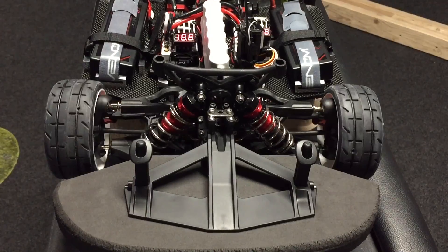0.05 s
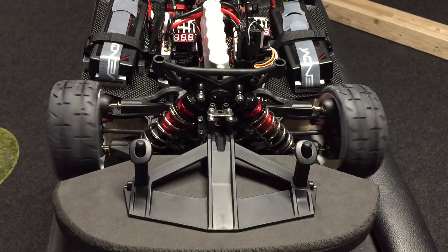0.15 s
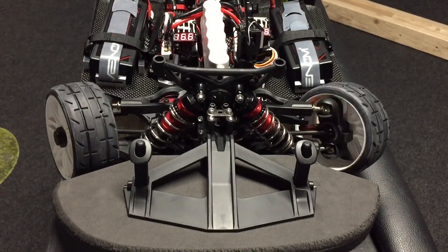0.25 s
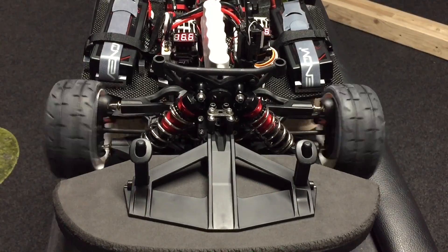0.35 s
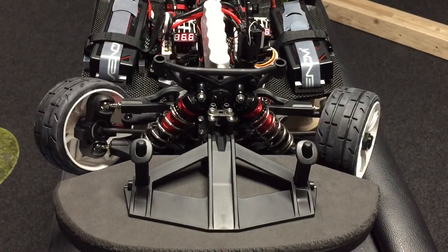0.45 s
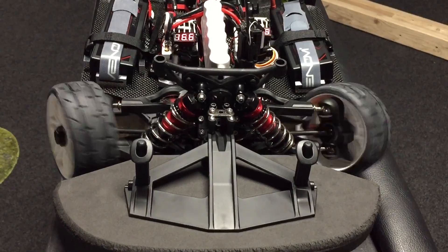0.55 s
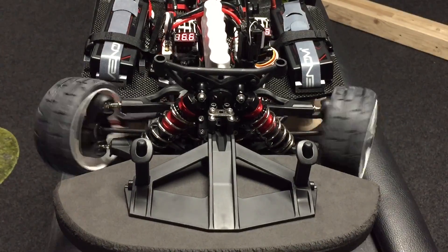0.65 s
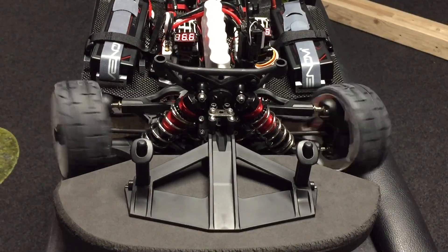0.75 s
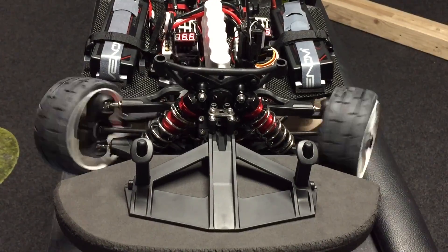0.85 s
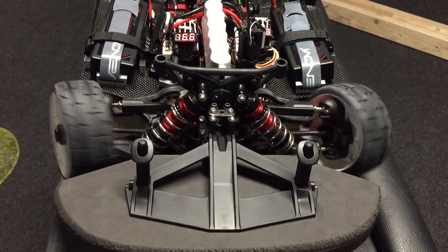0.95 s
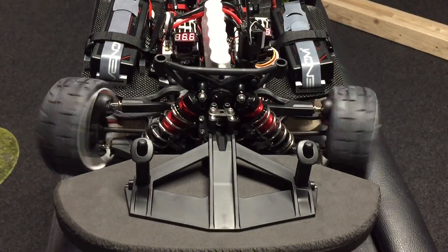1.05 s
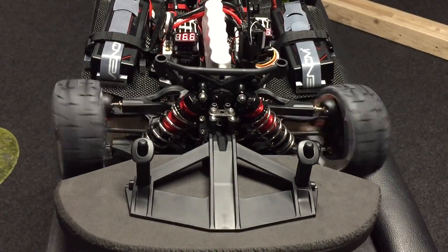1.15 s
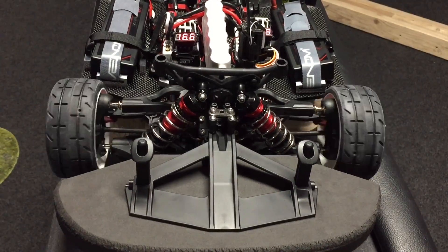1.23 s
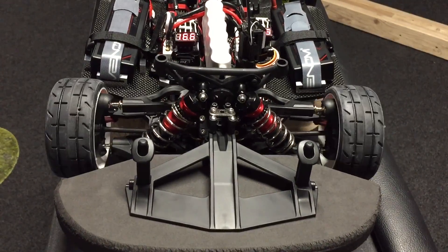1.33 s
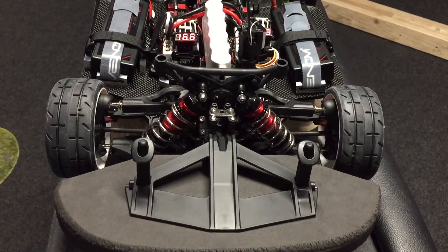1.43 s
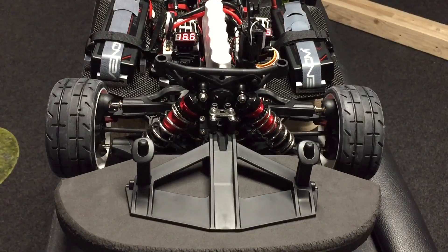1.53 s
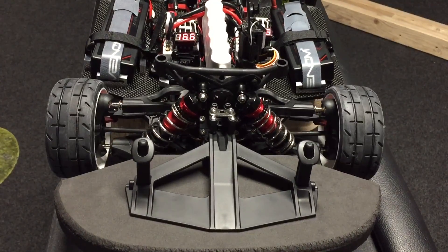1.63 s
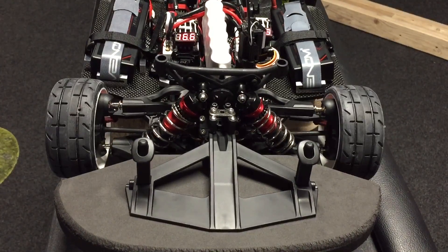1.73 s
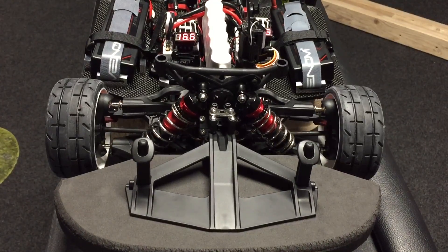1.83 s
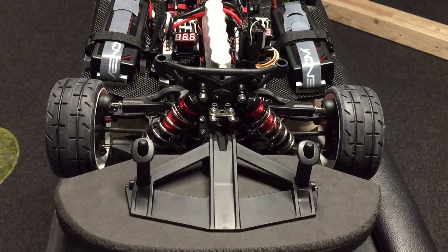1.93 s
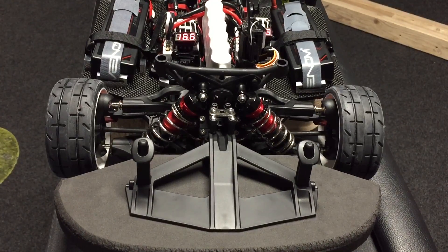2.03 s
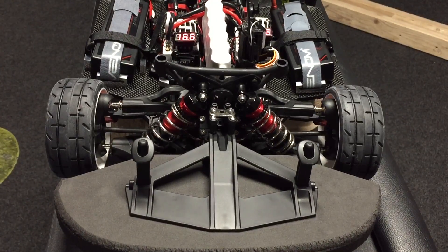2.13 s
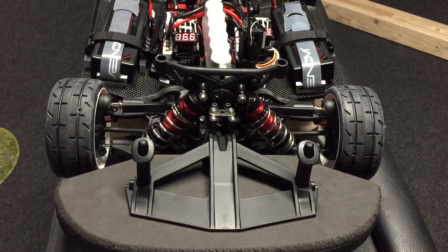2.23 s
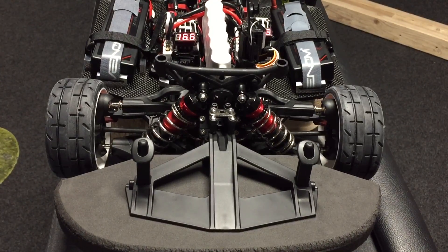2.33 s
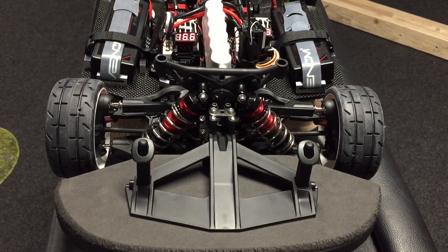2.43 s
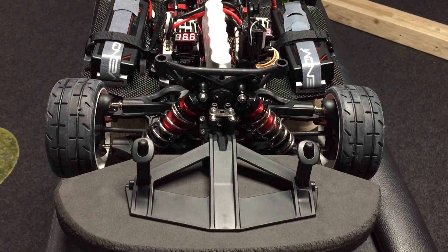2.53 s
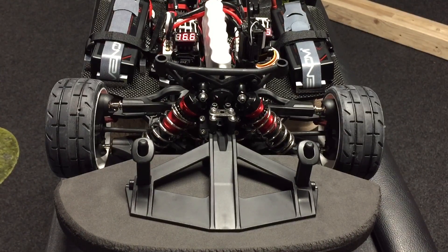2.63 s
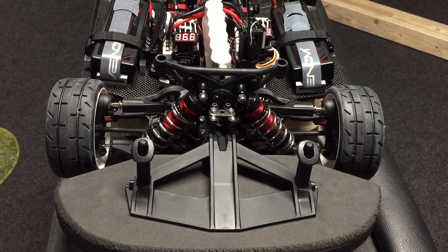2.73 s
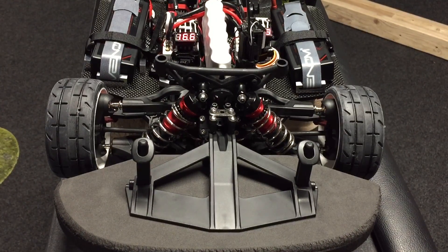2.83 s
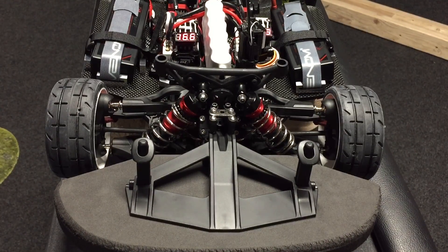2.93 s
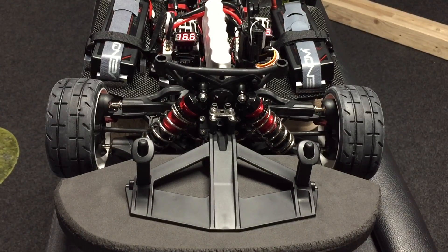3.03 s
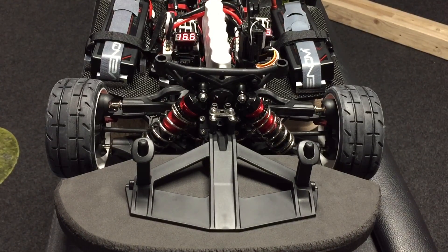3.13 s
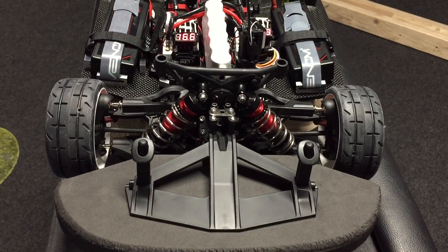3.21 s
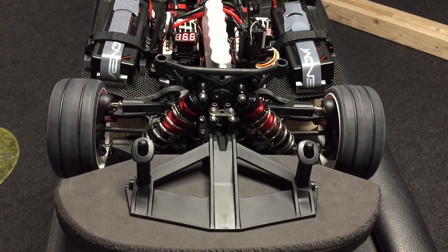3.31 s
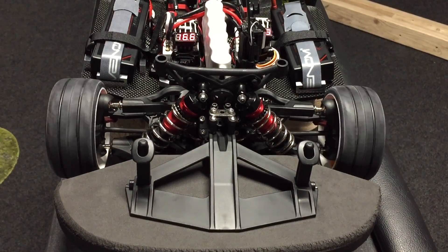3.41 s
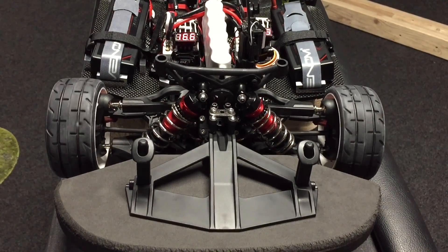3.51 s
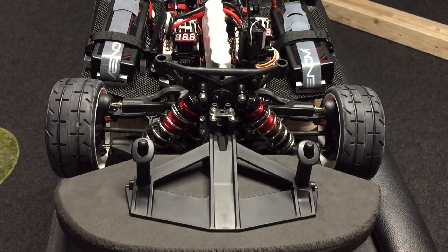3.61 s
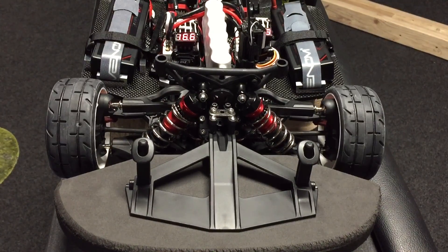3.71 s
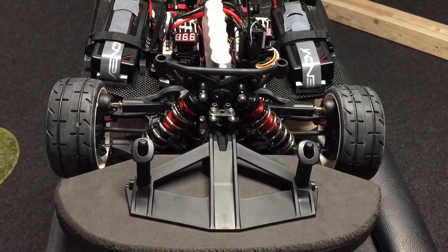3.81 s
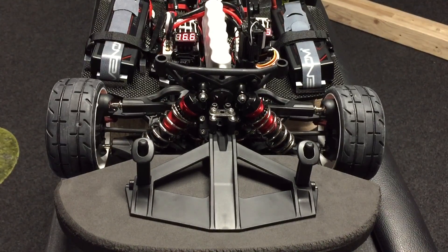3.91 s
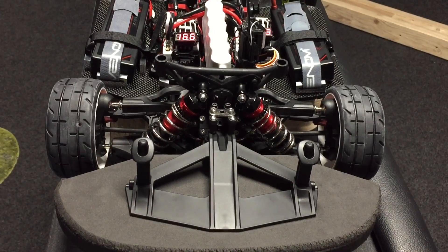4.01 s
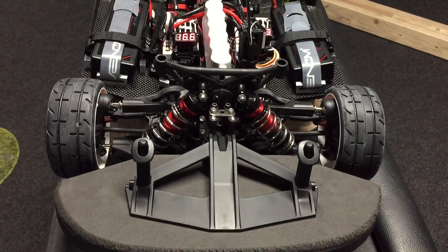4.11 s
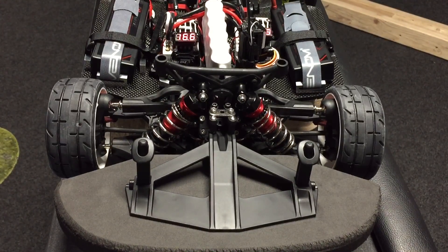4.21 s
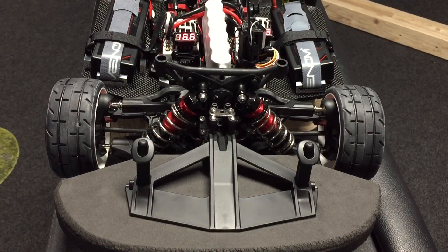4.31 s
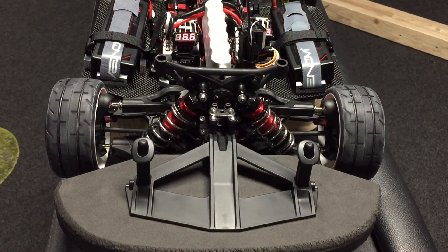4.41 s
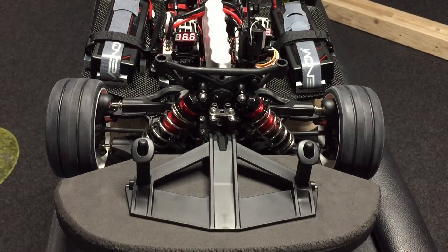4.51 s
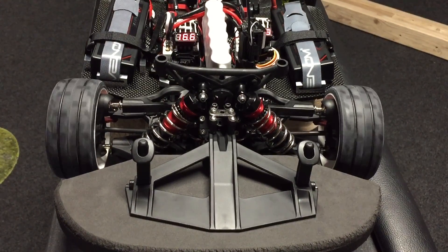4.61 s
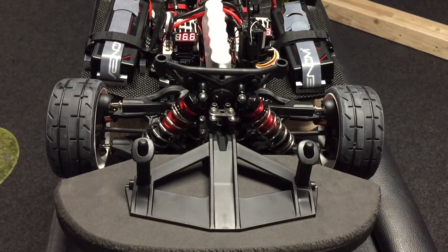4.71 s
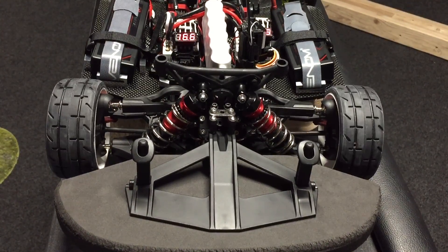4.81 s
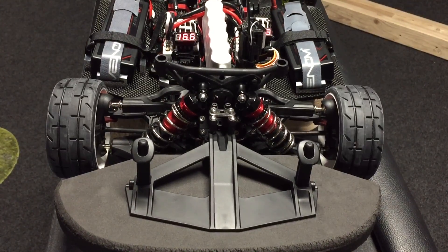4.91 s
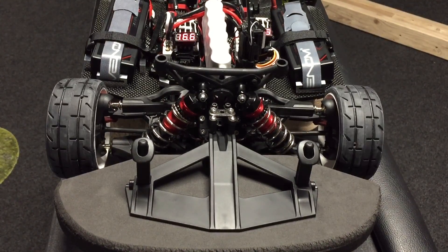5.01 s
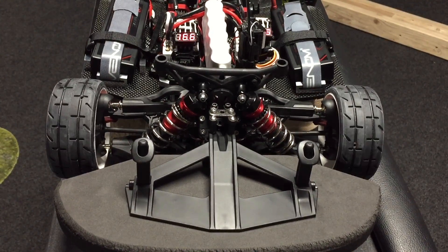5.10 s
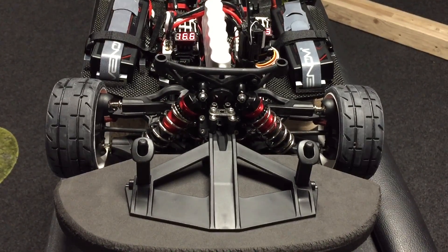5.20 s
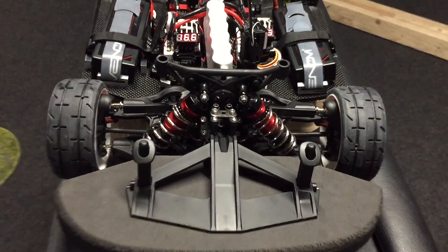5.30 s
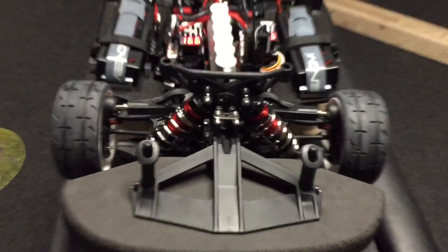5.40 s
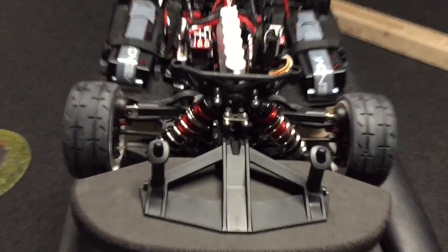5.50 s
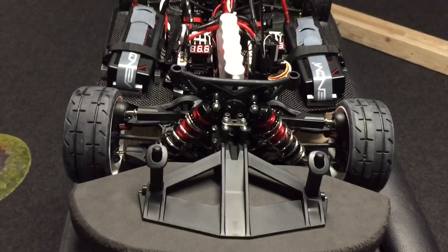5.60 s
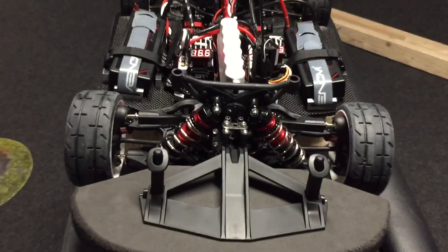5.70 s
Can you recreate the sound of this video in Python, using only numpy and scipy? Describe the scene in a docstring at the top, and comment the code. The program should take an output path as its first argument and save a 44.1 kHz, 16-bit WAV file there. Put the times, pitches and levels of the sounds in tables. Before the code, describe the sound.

A model car's steering servo zips and clacks rapidly side to side, then its drivetrain clatters in two short bursts over a tiny fan whine.

```python
"""Small room, a model car on a stand, the microphone in a camera close by; two tiny cooling fans run throughout.
First the steering servo throws the wheels side to side: swept gear whine, grainy rattle and tyre scrub,
with struck modes for the clacks of linkage slack. Holding its place, the servo then ticks faintly.
The drive motor blips twice and the drivetrain clatters out as noise grains, surges and a steel ring.
At the end the camera is moved: rumble, creak and two taps through its body."""
import sys
import numpy as np
from scipy import signal
from scipy.fft import rfft, irfft
from scipy.io import wavfile
from scipy.ndimage import uniform_filter1d

SR = 44100
rng = np.random.default_rng(int(sys.argv[2]) if len(sys.argv) > 2 else 0)


def file_out(sig):
    """Save sig as 16-bit WAV at sys.argv[1]."""
    # one column per channel
    cols = np.atleast_2d(sig).T
    # limit, then scale
    lim = np.clip(cols, -1, 1)
    pcm = np.round(lim * 32767).astype(np.int16)
    wavfile.write(sys.argv[1], SR, pcm)


N = 253575
T = np.arange(N) / SR

# Shaft speed of each fan. Each row: time in seconds, shaft turns a second.
FAN_A_SPEED = [(0, 239.6), (1.3, 239.9), (2.3, 241.1), (3.5, 241.3), (4, 242), (5.75, 242.3)]
FAN_B_SPEED = [(0, 204.7), (1.5, 204.8), (3, 205.1), (4.3, 205.5), (5.75, 205.6)]
# Tones of each seven-bladed fan. Each row: multiple of the shaft speed, mean level in dB rms.
FAN_A_ORDERS = [(1, -80), (2, -75), (7, -52), (8, -78), (14, -75), (21, -63), (25, -79), (28, -75)]
FAN_B_ORDERS = [(1, -77), (5, -72), (7, -54), (14, -79), (20, -79)]
# Colour of fan air and room tone. Each row: frequency in Hz, relative density in dB per Hz.
AIR_SPECTRUM = [(18, -74), (30, -52), (52, -18), (196, -24.5), (443, -44), (480, -36), (676, -39),
                (1000, -6.5), (1660, -6), (2100, -18.5), (4530, -17.5), (5160, -25), (8310, -20.5),
                (15200, -56.5), (16500, -56)]
AIR_DB = -54.5  # mean level, rms
# Resonances of the fan shrouds. Each row: frequency in Hz, width in Hz, level in dB rms.
SHROUD_PEAKS = [(1013, 17, -63.5), (1162, 87, -56.5), (4010, 70, -72), (5500, 630, -57.5), (8350, 430, -69),
                (9900, 430, -104)]
# Decay of the room. Each row: frequency in Hz, time to fall 60 dB in seconds.
ROOM_DECAY = [(250, 0.23), (660, 0.56), (1740, 0.46), (4590, 0.35), (12000, 0.062)]

# Hands shifting on the camera. Each row: time in seconds, rumble level in dB, creak level in dB.
HANDLING_LEVELS = [(5.22, -89, -76), (5.258, -57.5, -79), (5.346, -70, -79), (5.382, -55.5, -78),
                   (5.478, -52, -70), (5.492, -48, -43), (5.51, -52, -64), (5.575, -50.5, -66),
                   (5.585, -45, -51), (5.605, -53, -61), (5.708, -55, -52), (5.75, -64, -83)]
# A finger meets the camera body. Each row: start in seconds, peak of the body's ring in dB.
FINGER_TAPS = [(5.477, -32), (5.485, -29)]
# Colours of the handling. Each row: frequency in Hz, relative density in dB per Hz.
RUMBLE_SPECTRUM = [(15, -30), (35, -5), (70, 2.5), (130, -11.0), (250, -31), (1000, -70)]
CREAK_SPECTRUM = [(150, -32), (300, -14), (420, -3), (600, -18), (1200, -40), (5000, -71)]
# Modes of the camera body. Each row: frequency in Hz, relative level in dB, time to fall 60 dB in seconds.
BODY_MODES = [(97, -5, 0.06), (230, -4, 0.023), (380, -7, 0.02), (540, -7, 0.021), (850, -5.0, 0.023),
              (1300, -3, .015), (1950, -6, 0.013), (2540, -2.5, 0.015), (3030, -6, 0.015)]

# Spells of faint ticks from the holding servo. Each row: start in seconds, length in seconds, first level in dB.
HOLD_SPELLS = [(.07, 0.13, -62), (.32, .065, -59), (1.436, 0.18, -62.5), (1.745, .06, -74),
               (2.12, .12, -68), (2.26, .25, -73), (2.58, .03, -69), (2.66, .03, -67), (2.69, .5, -74)]
HOLD_FADE_DB = -9  # change over each spell
# Colour of the ticks. Each row: frequency in Hz, relative density in dB per Hz.
TICK_SPECTRUM = [(6000, -40), (9000, -23), (10300, -13), (11000, -2), (11800, -1), (13000, -11), (16000, -26)]

# The drivetrain's two runs, a list for each. Each row: time in seconds, clatter level in dB, upper part in dB.
DRIVE_RUNS = [
    [(3.303, -36, -25.5), (3.325, -34, -52), (3.369, -32, -22.5), (3.409, -37, -37), (3.45, -35.5, -30),
     (3.51, -38, -45), (3.604, -45.5, -58), (3.73, -75, -87)],
    [(4.477, -51, -36), (4.543, -39, -41), (4.65, -41.5, -41), (4.708, -44.5, -45), (4.734, -41, -39),
     (4.778, -42, -62), (4.802, -53, -47), (4.83, -66, -76), (4.9, -70, -70)],
]
# Colours of the clatter and its upper part. Each row: frequency in Hz, relative density in dB per Hz.
CLATTER_SPECTRUM = [(59, -60), (100, -28), (317, -19), (376, 3), (480, -7), (600, -3), (882, -1.5),
                    (1190, -10), (1310, -2.5), (2070, -14.5), (2680, -14.5), (3000, -12.5), (3900, -16),
                    (6600, -120)]
CLATTER_UPPER_SPECTRUM = [(1060, -3.5), (1800, 3), (1960, -2.5), (5730, -11), (10500, -30), (13000, -25),
                          (14200, -38), (15800, -36), (16500, -50)]
# Resonances of the chassis tub. Each row: frequency in Hz, width in Hz, relative level in dB.
TUB_PEAKS = [(395, 9.8, -6), (954, 34, -27), (1300, 880, 6), (2280, 100, 1), (2685, 93, 8.5),
             (3740, 150, 0)]
# Gear and drive-shaft slack knocking. Each row: start in seconds, reference level in dB,
# upper part in dB against it, peak of the steel part's ring in dB against it.
KNOCKS = [(3.303, -17, -15, -15.5), (3.315, -19, -17, -27), (3.338, -14, -7, -34), (3.351, -18, -5, -36),
          (3.364, -13.5, -18, -33), (3.375, -8, -15, -33), (3.386, -20.5, -3, -24), (3.399, -29, -13, -13),
          (3.428, -14.5, -7, -20), (3.457, -26, -13, -8), (3.496, -27, -17, -21), (3.533, -21.5, -6, -22),
          (3.586, -25, -13, -37), (3.623, -25.5, -14, -35), (4.479, -15.5, -11, -40),
          (4.517, -18, -11, -29), (4.535, -28, -11, -34), (4.543, -23, -6, -39), (4.557, -20, -14, -43),
          (4.577, -16.5, -6, -39), (4.601, -30, -10, -26), (4.614, -27, -8, -20), (4.629, -25, -8, -22),
          (4.64, -27.5, 3, -10.5), (4.667, -29, 1, -26), (4.686, -31, -6, -30), (4.729, -22, -18, -15),
          (4.79, -19.5, -11.5, -38), (4.802, -24.5, -15, -34)]
TICK_DB = -25  # sharp tick against a knock's upper part
# Modes of a steel part. Each row: frequency in Hz, relative level in dB, time to fall 60 dB in seconds.
STEEL_MODES = [(12600, 0, .2), (8975, -6, .05), (7560, -8, .04)]
# Switching tone of the drive motor. Each row: start in seconds, end in seconds, level in dB rms, its octave in dB rms.
THROTTLE_TONES = [(3.287, 3.392, -48.5, -55), (4.476, 4.583, -51.5, -55.5)]
SWITCH_HZ = 5568
# Colour of the shaking stand. Each row: frequency in Hz, relative density in dB per Hz.
STAND_SPECTRUM = [(20, -28), (60, -12), (150, -13), (300, -9), (900, -60)]

# Slack taken up in the linkage. Each row: start in seconds, main ring's peak in dB, dull part in dB against it.
CLACKS = [(0.0259, -13, -31), (0.295, -25.5, 8.5), (0.3952, -17, -14), (0.4467, -15.5, -21),
          (0.494, -5, -8), (0.5899, -13.5, -25), (0.63, -20.5, -16), (0.6574, -28, 2), (0.6644, -29, -14),
          (0.7189, -20, -7), (0.7658, -6, -6), (0.8, -20, -26), (0.844, -31, -16), (0.9127, -20.5, -6),
          (0.959, -7.5, -6.5), (0.9956, -17.5, -14), (1.067, -22.5, 0), (1.076, -29, 8.5),
          (1.1304, -23, -14), (1.1774, -6.5, -6.5), (1.21, -16, -18), (1.2517, -22, -22), (1.3312, -19, -2)]
# Dull, main and bright modes of the linkage. Each row: frequency in Hz, relative level in dB,
# time to fall 60 dB in seconds.
LINK_DULL_MODES = [(1100, -2, 0.02), (1514, 6, 0.013), (1866, 14.5, 0.0096), (2220, -22, 0.015)]
LINK_MODES = [(2700, -8, .012), (3200, -9, .008), (3720, -1.5, .012), (4500, -10, .007), (5290, -8, .008),
              (6350, -4, .009), (7340, -8, .009)]
LINK_BRIGHT_MODES = [(8660, 3, 0.023), (9950, 6, 0.011), (11000, -3, 0.02), (12600, 1, .006),
                     (14000, -1, .004)]
BRIGHT_DB, BRIGHT_SHARE = -34, .35  # the bright ring grows only a little with the blow
# The chassis rocks on its stand. Each row: start in seconds, level in dB at the blow, frequency in Hz.
ROCKS = [(0.036, -41.5, 130), (0.297, -31.5, 141), (0.427, -39, 148), (0.502, -43, 139), (0.597, -48, 151),
         (0.663, -33, 149), (0.814, -47, 140), (0.881, -55, 146), (0.958, -47, 156), (1.071, -33.5, 154.5),
         (1.189, -43, 153), (1.263, -50, 115), (4.52, -47, 127)]

# The steering at work, a list for each spell. Each row: time in seconds, rattle level in dB, tyre scrub level in dB.
STEER_SPELLS = [
    [(0.0, -35, -50), (0.034, -34, -38), (0.088, -55, -57), (0.11, -49, -62)],
    [(0.2, -55, -75), (0.222, -45.5, -76), (0.3, -33.5, -29.5), (0.32, -46.5, -31), (0.34, -50, -40),
     (0.38, -50, -52), (0.392, -36, -37.5), (0.494, -34.5, -36), (0.548, -39, -44), (0.59, -33.5, -35.5),
     (0.648, -40, -44), (0.66, -37, -26.5), (0.758, -36.5, -50), (0.77, -38, -31), (0.79, -38, -39),
     (0.954, -37.5, -41.5), (0.964, -39, -27), (0.98, -40, -39), (1.136, -37.5, -39), (1.165, -35, -36.5),
     (1.184, -40, -31), (1.2, -37, -38), (1.316, -40, -40), (1.43, -58, -64.5)],
]
# Colours of gear rattle and tyre scrub. Each row: frequency in Hz, relative density in dB per Hz.
RATTLE_SPECTRUM = [(590, -15.5), (1000, 1.5), (1880, -2.5), (2270, 1), (3310, -0.5), (4650, -12),
                   (5110, -6.5), (6160, -3), (8860, -7.5), (10100, -11.5), (15000, -8.5), (15900, -12),
                   (16500, -60)]
SCRUB_SPECTRUM = [(35, -63), (60, -21), (145, -9.5), (215, -20.5), (398, -9.5), (461, -10.5), (618, -6),
                  (1330, -8.5), (2000, -3), (2600, -43), (4400, -120)]
# Resonances of the servo case. Each row: frequency in Hz, width in Hz, relative level in dB.
CASE_PEAKS = [(1880, 100, 2), (3840, 63, -31), (4530, 210, 3), (5720, 450, -10.5), (8830, 220, -0.5),
              (11160, 490, -6)]
# Servo strokes: the tooth rate climbs to a knee, then sags or creeps on; a braking stroke has its knee at once.
# Each row: start in seconds, knee in seconds after it, length in seconds, tooth rate in Hz at start, knee and end,
# whine level in dB and its octave in dB, both before the colour of the case.
STROKES = [(0, .001, .022, 4510, 4500, 3550, -38, -46), (.243, .03, .05, 2480, 4500, 4500, -39, -41),
           (.4, .001, .024, 4000, 3990, 2850, -55, -41), (.424, .022, .047, 3800, 4950, 4250, -33, -43),
           (.498, .001, .018, 4900, 4890, 3060, -42, -41), (.54, .021, .045, 3240, 4700, 3530, -37, -46),
           (.612, .001, .019, 4800, 4790, 4450, -33, -54), (.672, .008, .027, 3000, 3450, 3560, -44, -36),
           (.701, .016, .048, 4200, 4950, 4660, -35, -50), (.78, .026, .066, 2580, 4520, 4800, -35, -34),
           (.878, .034, .058, 2130, 4950, 4400, -33, -42), (.975, .026, .07, 2580, 4520, 4800, -38, -34),
           (1.087, .001, .022, 3560, 3550, 3400, -44, -39), (1.111, .017, .045, 4100, 5000, 4600, -32, -48),
           (1.193, .022, .058, 2580, 4480, 4800, -35, -35), (1.28, .03, .032, 2390, 4820, 4800, -39, -39)]
# How the case passes tooth tones. Each row: frequency in Hz, gain in dB.
WHINE_GAIN = [(2200, -10), (3100, 1), (3700, -3), (4250, 3), (4520, -3), (4750, 5), (5200, 0), (6300, 4),
              (7000, 4), (8000, 2), (8900, 3), (9500, -8), (15000, -12)]
# The servo strains against its end stop: start in seconds, end in seconds, buzz level in dB rms.
STALL = (.34, .39, -47)
UPDATE_HZ = 368.7  # the servo's drive pulses a second
# An off-centre gear loads the teeth once a turn: period and first full load in seconds, depth from 0 to 1.
THROB_S, THROB_FIRST_S, THROB_DEPTH = .0255, .008, .8
# Gears rattle harder under load and when jolted; a jolt dies by 20 dB in CLACK_RATTLE_S seconds.
STROKE_RATTLE_DB, CLACK_RATTLE_DB, CLACK_RATTLE_SHARE, CLACK_RATTLE_S = -36, -26, 0.39, 0.016
# Drive buzz against the rattle: strong while the motor strains, weak while it runs.
BUZZ_IDLE_DB, BUZZ_MOVING_DB = -3, -22
SLOWING_OCTAVE_DB = 8  # the octave is stronger while the gears slow down
EDGE_HZ = 15800  # upper band limit


def gain_of(db):
    """Amplitude factor of a level in dB."""
    return 10 ** (np.asarray(db) / 20)


def evened(x):
    """Scales a sound to rms 1."""
    return x / np.sqrt(np.mean(x ** 2) + 1e-20)


def read(points, hz):
    """Reads a table of values against frequency, interpolating along log frequency."""
    f, value = np.transpose(points)
    return np.interp(np.log(hz + 1), np.log(f + 1), value)


def curve(tables, column):
    """One level column of several tables over the whole time; -120 dB between them."""
    out = np.full(N, -120.)
    for rows in map(np.array, tables):
        inside = (T >= rows[0, 0]) & (T <= rows[-1, 0])
        out[inside] = np.interp(T[inside], rows[:, 0], rows[:, column])
    return out


def add(mix, s, sound):
    """Adds a sound into the mix from s seconds on."""
    part = mix[round(max(s, 0) * SR):][:len(sound)]
    part += sound[:len(part)]


def decay(t, t60):
    """Exponential fall of 60 dB in t60 seconds."""
    return gain_of(-60 * t / t60)


def onset(t, rise_s):
    """Exponential approach to full level."""
    return 1 - np.exp(-t / rise_s)


def highpassed(x, order, hz):
    """Takes away what lies below hz."""
    return signal.sosfilt(signal.butter(order, hz, "high", fs=SR, output="sos"), x)


def coloured(x, spectrum, peaks=(), peak_db=0):
    """Filters x by a spectrum with narrow resonances standing out of it; rms 1."""
    hz = np.fft.rfftfreq(N, 1 / SR)
    lift = 1 + sum(gain_of(peak_db + db) / (1 + 1j * 2 * (hz - f) / w) for f, w, db in peaks)
    return evened(irfft(rfft(x) * gain_of(read(spectrum, hz)) * lift, N))


def wander(per_s):
    """Slow chance from twice-smoothed noise, rms 1."""
    size = max(int(SR / per_s), 2)
    return evened(uniform_filter1d(uniform_filter1d(rng.standard_normal(N), size), size))


def grains(per_s, spread_db, smooth, grain_s):
    """Short scrapes of uneven size over a share of smooth noise."""
    starts = rng.random(N) < per_s / SR
    size = gain_of(spread_db * np.minimum(rng.exponential(1, N), 4)) * starts
    envelope = signal.lfilter([1], [1, -np.exp(-1 / (grain_s * SR))], size)
    return (evened(envelope) + smooth) * rng.standard_normal(N)


def ring(modes, chance, length_s=0.035, rise_s=0.00043):
    """Struck modes, peak 1; chance shifts each mode's pitch and phase."""
    t = np.arange(int(length_s * SR)) / SR
    x = np.zeros(len(t))
    for (hz, db, t60), shift in zip(modes, chance):
        x += gain_of(db) * decay(t, t60) * np.sin(2 * np.pi * hz * (1 + shift) * t + 300 * shift)
    x = x * onset(t, rise_s)
    return x / abs(x).max()


def room(x):
    """Small-room reflections: sparse taps of random sign, each band dying at its own speed."""
    taps = np.zeros(SR // 2)
    at = np.arange(200, SR // 2 - 20, 20)
    taps[at + rng.integers(0, 20, len(at))] = rng.choice([-1., 1.], len(at))
    hz, t, bands = signal.stft(taps, SR, nperseg=256)
    tail = signal.istft(bands * decay(t, read(ROOM_DECAY, hz)[:, None]), SR, nperseg=256)[1]
    return signal.fftconvolve(x, tail / np.linalg.norm(tail))[:N]


def fans():
    """Blade and shaft tones, multiples of each shaft speed, waver a little over the air noise."""
    out = gain_of(AIR_DB + 1.5 * wander(4)) * coloured(rng.standard_normal(N), AIR_SPECTRUM)
    for hz, width, db in SHROUD_PEAKS:
        out += gain_of(db) * coloured(rng.standard_normal(N), [(20, -69.5), (20000, -63.5)], [(hz, width, 40)])
    for speed, orders in ((FAN_A_SPEED, FAN_A_ORDERS), (FAN_B_SPEED, FAN_B_ORDERS)):
        shaft_hz = np.interp(T, *np.transpose(speed)) * (1 + 0.000826 * wander(3.97))
        turns = np.cumsum(shaft_hz) / SR
        for k, db in orders:
            tone = np.sin(2 * np.pi * (k * turns + rng.random()))
            out += np.sqrt(2) * gain_of(db + 0.96 * wander(24)) * tone
    return out


def handling():
    """Lumpy rumble and a faint creak through the camera body, whose struck modes ring at two taps."""
    rumble = coloured(rng.standard_normal(N), RUMBLE_SPECTRUM)
    creak = coloured(grains(per_s=74, spread_db=3., smooth=0.49, grain_s=.006), CREAK_SPECTRUM)
    out = gain_of(curve([HANDLING_LEVELS], 1)) * rumble + gain_of(curve([HANDLING_LEVELS], 2)) * creak
    t = T[:900]
    for s, db in FINGER_TAPS:
        thud = uniform_filter1d(rng.standard_normal(len(t)), 7)
        add(out, s, gain_of(db - 10) * decay(t, 0.038) * thud)
        add(out, s, gain_of(db) * ring(BODY_MODES, np.zeros(len(BODY_MODES)), .08, 0.0002))
    return out


def hold():
    """Current pulses at the servo's update rate, in throbs."""
    pulses = np.diff(np.floor(T * UPDATE_HZ), prepend=0) * (1 + .5 * rng.standard_normal(N))
    throb_hz = 56 * (1 + .15 * wander(30))
    throb = (1 + np.cos(2 * np.pi * np.cumsum(throb_hz) / SR)) ** 3
    spells = np.zeros(N)
    for s, length, db in HOLD_SPELLS:
        add(spells, s, gain_of(db + HOLD_FADE_DB * np.linspace(0, 1, int(length * SR))))
    return spells * coloured(throb * (pulses + 0.045 * rng.standard_normal(N)), TICK_SPECTRUM)


def drivetrain():
    """Loose gears and shafts clatter into the tub; each knock is a brief surge that also rings a steel part."""
    run_db = curve(DRIVE_RUNS, 1)
    low, upper = gain_of(run_db + 2. * wander(48)), gain_of(curve(DRIVE_RUNS, 2))
    # a narrow band of noise at the steel part's first mode follows the runs
    steel_peak = [(STEEL_MODES[0][0], 40, 50)]
    out = gain_of(run_db - 18) * coloured(rng.standard_normal(N), [(20, -60), (20000, -60)], steel_peak)
    t = np.arange(int(.06 * SR)) / SR
    for s, db, upper_db, steel_db in KNOCKS:
        add(low, s, gain_of(db - 12.5) * decay(t, 0.065) * onset(t, 0.0017))
        add(upper, s, gain_of(db + upper_db - 5) * decay(t, 0.026))
        tick = np.diff(rng.standard_normal(len(t)), n=2, prepend=[0, 0])  # differencing leaves mostly treble
        add(out, s, gain_of(db + upper_db + TICK_DB) * decay(t, 0.018) * tick)
        chance = 0.00056 * rng.standard_normal(len(STEEL_MODES))
        add(out, s, gain_of(db + steel_db) * ring(STEEL_MODES, chance, .35))
    clatter = grains(per_s=900, spread_db=1.5, smooth=0.93, grain_s=0.0013)
    out += low * coloured(clatter, CLATTER_SPECTRUM, TUB_PEAKS, 1.9)
    upper_clatter = grains(per_s=1500, spread_db=1.5, smooth=.9, grain_s=0.0016)
    out += upper * coloured(upper_clatter, CLATTER_UPPER_SPECTRUM)
    for start, end, db, octave_db in THROTTLE_TONES:
        t = np.arange(0, end - start, 1 / SR)
        phase = 2 * np.pi * SWITCH_HZ * t
        tone = gain_of(db) * np.sin(phase) + gain_of(octave_db) * np.sin(2 * phase)
        flicker = gain_of(3. * wander(120)[:len(t)])
        add(out, start, np.sqrt(2) * tone * signal.windows.tukey(len(t), .1) * flicker)
    stand_shake = gain_of(run_db - 26.5) * coloured(rng.standard_normal(N), STAND_SPECTRUM)
    return stand_shake + highpassed(out, 8, 355)  # the clatter, knocks and ring hold no bass


def linkage():
    """Clacks ring the rods, horn and hubs; the dull body answers a moment later and the stand thuds."""
    out = np.zeros(N)
    t = T[:600]
    for s, db, dull_db in CLACKS:
        chance = .012 * rng.standard_normal((3, 7))
        add(out, s, gain_of(db) * ring(LINK_MODES, chance[0]))
        add(out, s, gain_of(BRIGHT_DB + BRIGHT_SHARE * db) * ring(LINK_BRIGHT_MODES, chance[1]))
        add(out, s + 0.001213, gain_of(db + dull_db) * ring(LINK_DULL_MODES, chance[2], rise_s=0.00049))
        add(out, s + .0016, gain_of(db - 6) * ring(LINK_MODES, chance[1]))  # rebound
        dry_crack = np.convolve(rng.standard_normal(len(t)), [1, 1, 0, -1, -1], "same") / 2
        add(out, s, gain_of(db - 6) * decay(t, .015) * onset(t, .0005) * dry_crack)
    t = np.arange(int(.3 * SR)) / SR
    for s, db, hz in ROCKS:
        add(out, s, gain_of(db) * decay(t, 0.12) * onset(t, 0.00038) * np.sin(2 * np.pi * hz * t))
    return out


def servo():
    """Each stroke sweeps the pinion's tooth rate over the rattle of the gear train; drive pulses buzz in the case."""
    work_db = uniform_filter1d(curve(STEER_SPELLS, 1), 300)
    s, knee, length, hz0, hz1, hz2 = np.transpose(STROKES)[:6]
    times = np.ravel([s, s + knee, s + length], "F")  # "F" keeps each stroke's three points together
    tooth_hz = uniform_filter1d(np.interp(T, times, np.ravel([hz0, hz1, hz2], "F")), 150)
    teeth = np.cumsum(tooth_hz * (1 + 0.01004 * wander(148))) / SR

    # levels of the first and second harmonic, the rattle and the motion
    coasting = gain_of(work_db - 20) * (T < s[-1] + length[-1])  # the faint whine between strokes
    first, second, shake, moving = coasting.copy(), coasting.copy(), gain_of(work_db), np.zeros(N)
    for s, _, length, _, _, _, db, octave_db in STROKES:
        t = np.arange(0, length + 0.0047, 1 / SR)
        edges = signal.windows.tukey(len(t), min(0.014 / length, 1))
        load = edges * (1 - THROB_DEPTH * np.sin(np.pi * (t - THROB_FIRST_S) / THROB_S) ** 2)
        add(first, s - .002, load * gain_of(db))
        add(second, s - .002, load * gain_of(octave_db))
        add(shake, s - .002, load * gain_of(STROKE_RATTLE_DB))
        add(moving, s - .002, edges)
    for s, db, _ in CLACKS:
        add(shake, s, gain_of(CLACK_RATTLE_DB + CLACK_RATTLE_SHARE * db - 20 * T[:1500] / CLACK_RATTLE_S))
    slowing = uniform_filter1d(1. * (np.gradient(tooth_hz) < 0), 100)
    second = second * gain_of(SLOWING_OCTAVE_DB * slowing)

    whine = np.zeros(N)
    for k, size in ((1, first), (2, second), (3, gain_of(-6) * second)):
        whine += size * gain_of(read(WHINE_GAIN, k * tooth_hz)) * np.sin(k * 2 * np.pi * teeth)
    # the next gear pair meshes slower
    whine += gain_of(-11) * (first + second) * np.sin(.72 * 2 * np.pi * teeth)

    rattle = grains(per_s=1500, spread_db=2.7, smooth=0.67, grain_s=0.0013)
    rattle = coloured(rattle, RATTLE_SPECTRUM, CASE_PEAKS, 5.8)
    bright = highpassed(rattle, 2, 8000)
    rattle = shake * (rattle - bright * np.clip(1 - shake / gain_of(-37), 0, .9))  # gentle running is duller

    # narrow pulses of uneven size
    pulses = np.exp(300 * (np.cos(2 * np.pi * UPDATE_HZ * T) - 1)) * (1 + 0.11 * rng.standard_normal(N))
    buzz_db = BUZZ_IDLE_DB + (BUZZ_MOVING_DB - BUZZ_IDLE_DB) * np.minimum(moving, 1)
    strain = gain_of(work_db + buzz_db)
    start, end, stall_db = STALL
    add(strain, start, gain_of(stall_db) * signal.windows.tukey(int((end - start) * SR), .3))
    buzz = strain * coloured(pulses, RATTLE_SPECTRUM, CASE_PEAKS, 6.1)

    scrub = coloured(grains(per_s=500, spread_db=2.4, smooth=0.6, grain_s=0.0023), SCRUB_SPECTRUM)
    scrub = gain_of(curve(STEER_SPELLS, 2) + 4.23 * wander(55)) * scrub
    return whine * (.8 + 0.42 * wander(450)) + rattle + buzz + scrub


def scene():
    """The car's bursts get the room; fans and handling are steady or structure-borne."""
    car = servo() + linkage() + drivetrain() + hold()
    return (car + gain_of(-19) * room(car) + fans() + handling())[None]


def record(dry):
    """The microphone drops the deep bass; then the band limit."""
    thinned = highpassed(dry, 3, 48)
    band_limit = signal.firwin(1023, EDGE_HZ, window=("kaiser", 9), fs=SR)
    return signal.oaconvolve(thinned, band_limit[None], "same")


dry = scene()
out = record(dry)
file_out(out)
```